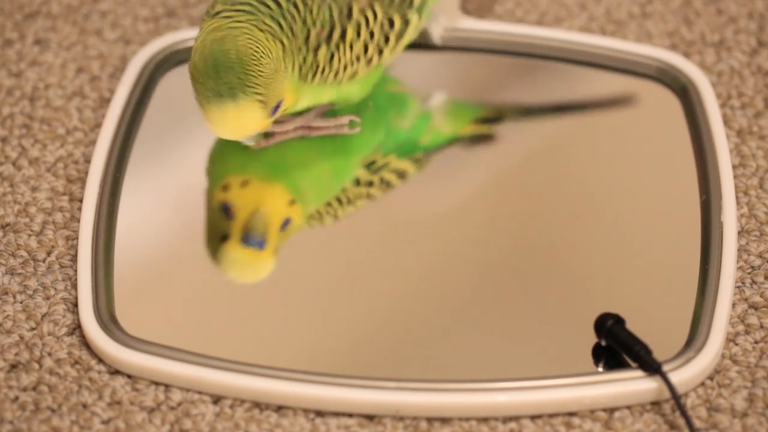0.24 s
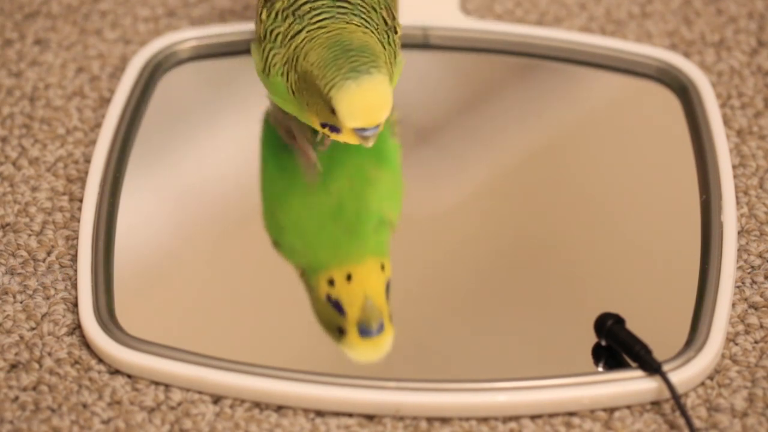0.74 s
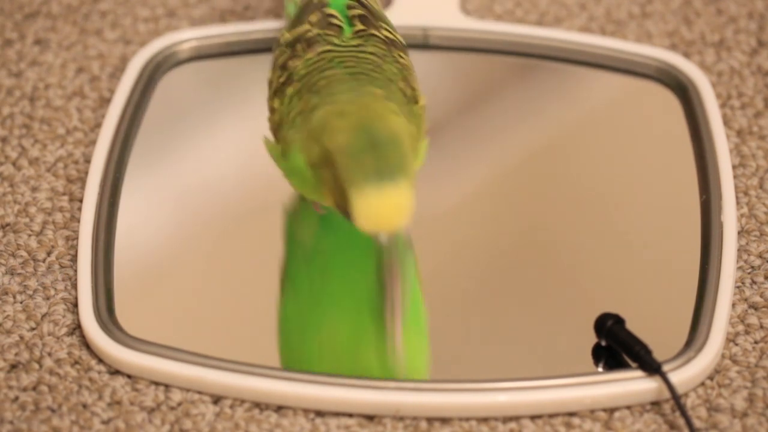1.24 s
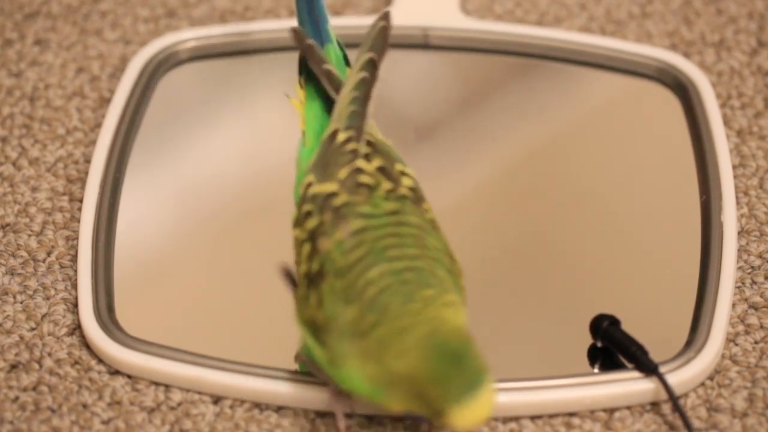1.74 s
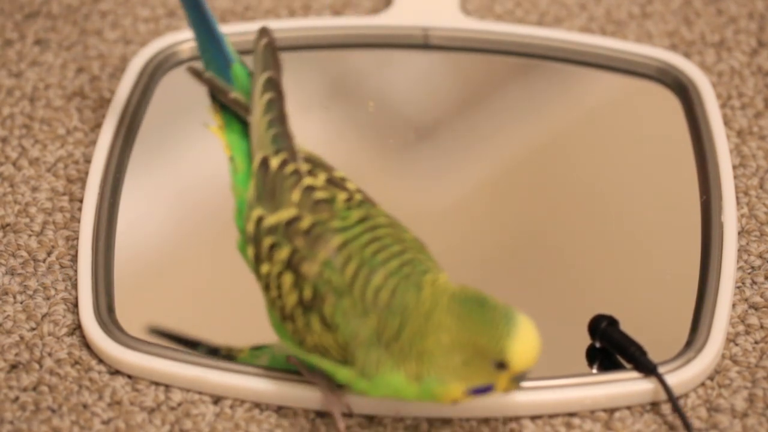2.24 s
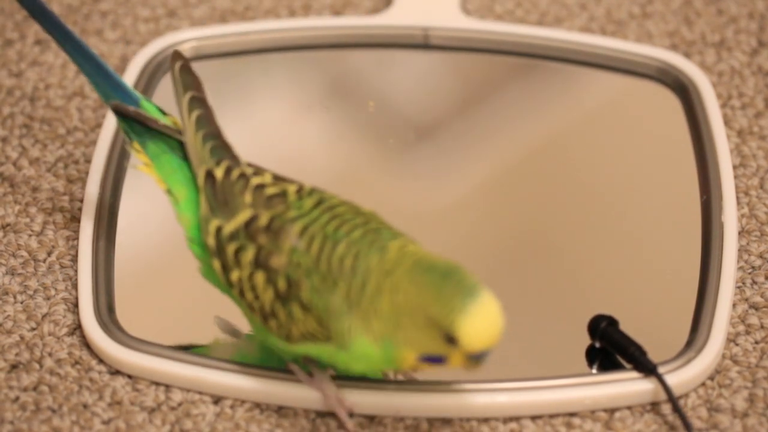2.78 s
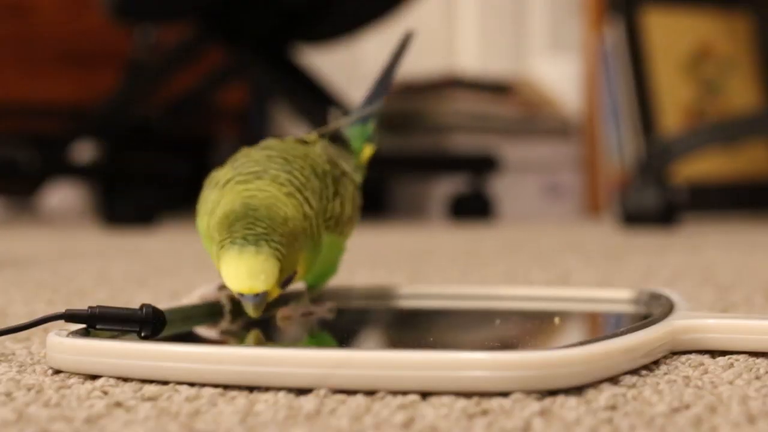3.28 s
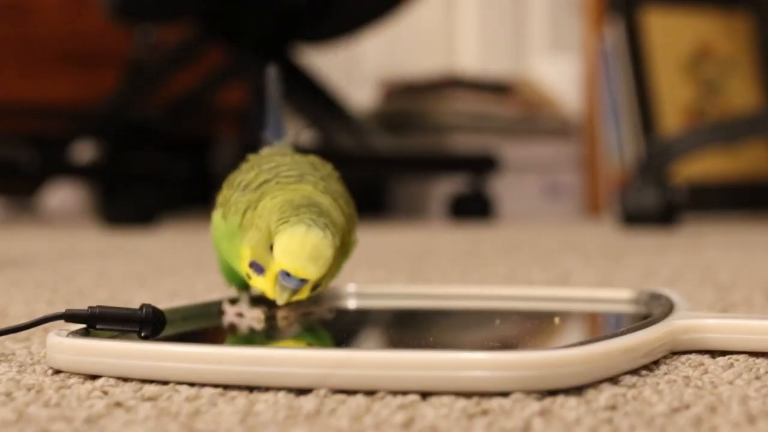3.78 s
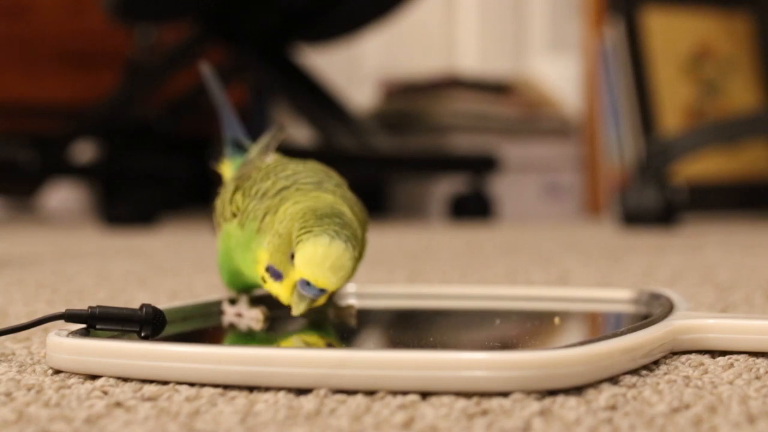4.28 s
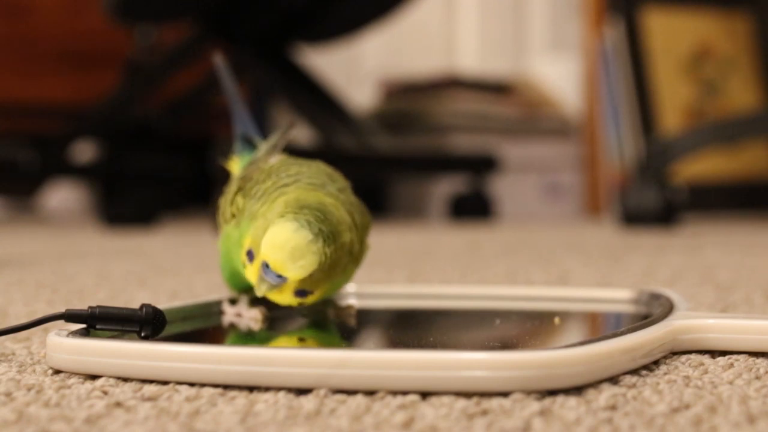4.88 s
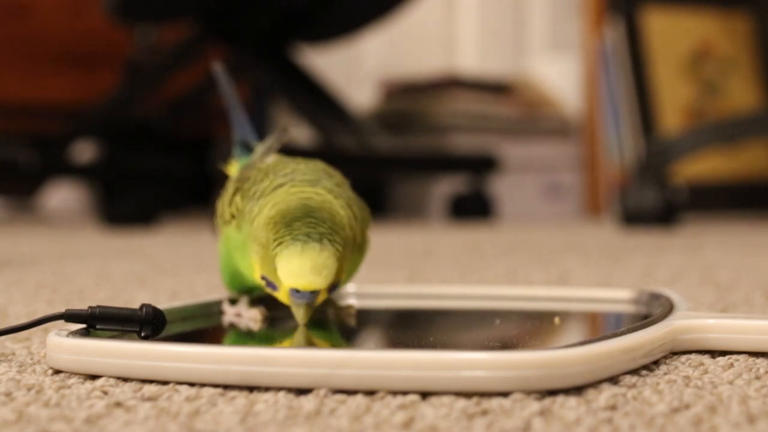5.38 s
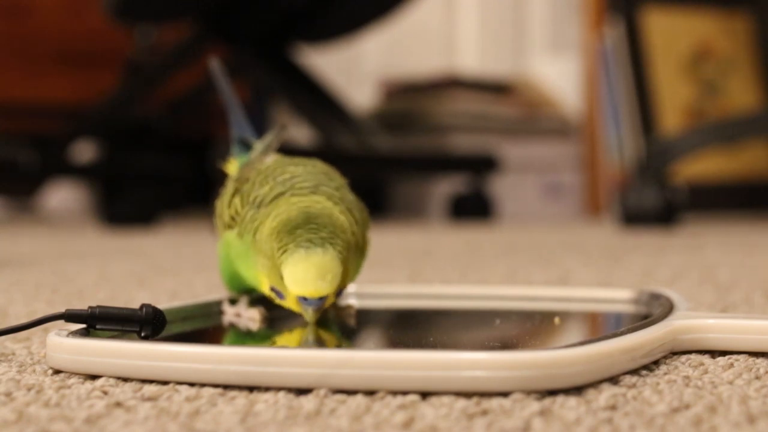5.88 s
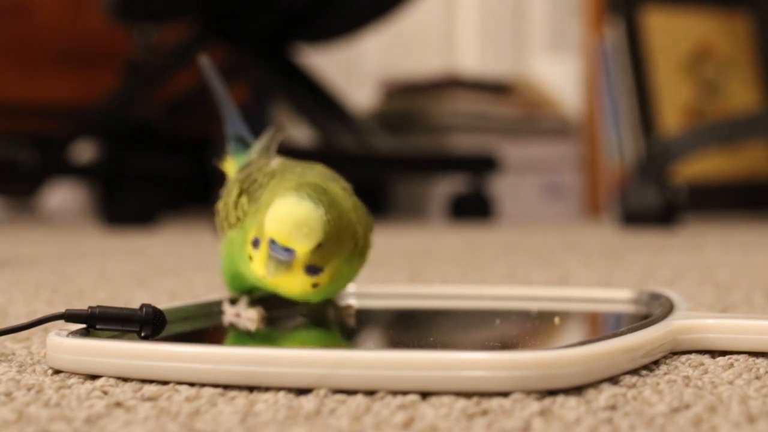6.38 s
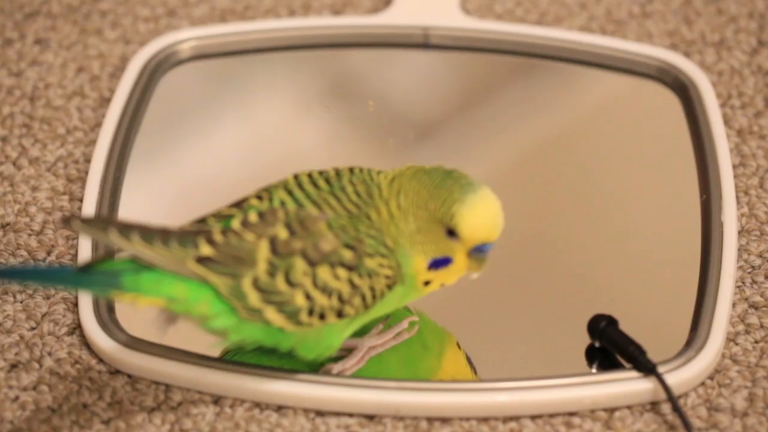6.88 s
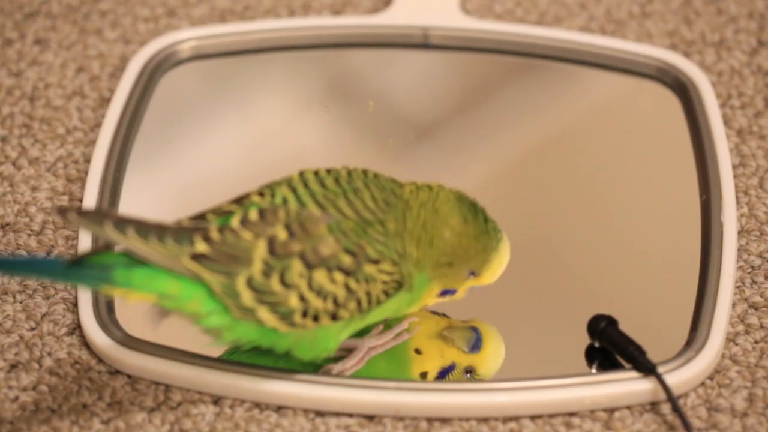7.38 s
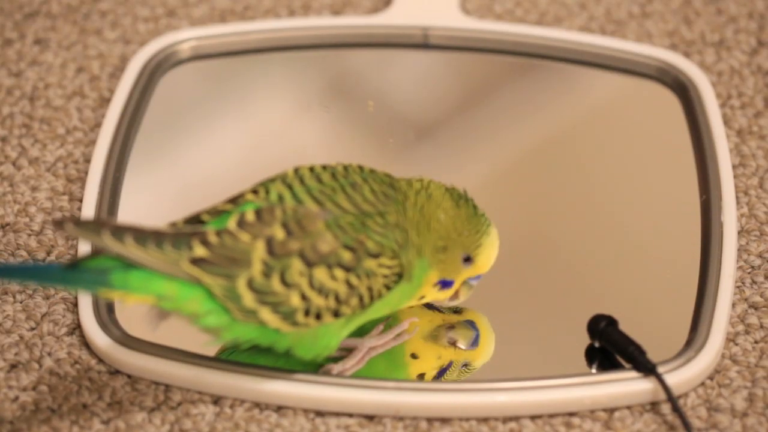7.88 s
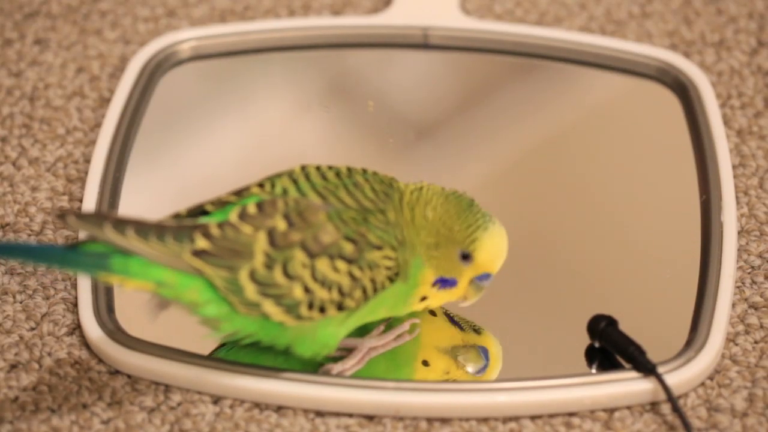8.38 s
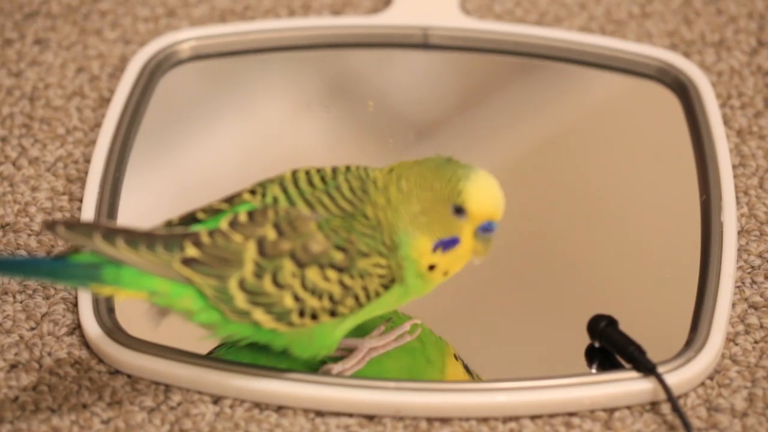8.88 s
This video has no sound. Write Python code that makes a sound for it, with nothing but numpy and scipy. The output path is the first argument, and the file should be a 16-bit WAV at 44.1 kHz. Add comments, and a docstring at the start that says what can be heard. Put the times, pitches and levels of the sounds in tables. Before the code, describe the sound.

A budgie's claws click and its beak taps sharply on a glass mirror lying on carpet, with a few raspy chirps from another budgie farther off.

```python
"""Carpeted room: a budgie walks over a hand mirror lying on the carpet, tapping and nibbling the glass up
close. Beak and claws are filtered impulses with chatter; steps and firm pecks ring the mirror's damped modes,
two landings thump. Nibbles and scrapes are grains of stick-slip noise. A second budgie farther off chirps with
fluttering harmonics and raspy noise, heard with the room's noise tail. Rumble, hum, hiss and soft rustling lie
beneath."""
import sys
import numpy as np
from scipy import signal
from scipy.fft import rfft, irfft, next_fast_len
from scipy.io import wavfile
from scipy.ndimage import map_coordinates

SR = 44100
rng = np.random.default_rng(int(sys.argv[2]) if len(sys.argv) > 2 else 0)


def wrap_up_sound(samples):
    """Save the sound to the file named by the first command line argument, as 16-bit audio."""
    columns = np.atleast_2d(samples).T
    # keep every value between -1 and 1, then stretch to whole-number steps
    tamed = np.clip(columns, -1, 1)
    steps = np.round(tamed * 32767).astype(np.int16)
    wavfile.write(sys.argv[1], SR, steps)


N = 403074

PECK_BODY_DB = -14.5  # low body against the knock, for beak contacts
LONG_CHATTER_T60_S = 0.0084  # claws and nibbles skid longer than a peck


def amp(db):
    """Decibels to gain."""
    return 10 ** (np.asarray(db) / 20)


def unit(x):
    """Scale to rms 1."""
    return x / np.sqrt(np.mean(x ** 2) + 1e-20)


def burst(x):
    """Scale to the energy of one millisecond at rms 1."""
    return x * np.sqrt(SR / 1000 / np.sum(x ** 2))


def along(points, hz):
    """Interpolate (Hz, value) points on a log frequency axis."""
    point_hz, values = np.transpose(points)
    return np.interp(np.log(hz + 1), np.log(point_hz + 1), values)


def clock(length_s):
    """Sample times over a length."""
    return np.arange(int(length_s * SR)) / SR


def curves(rows):
    """Each column interpolated per sample from the first row's time to the last's."""
    times, *columns = np.transpose(rows)
    t = times[0] + clock(times[-1] - times[0])
    return [np.interp(t, times, column) for column in columns]


def add(track, start_s, x):
    """Mix x into the track at a time."""
    part = track[max(round(start_s * SR), 0):][:len(x)]
    part += x[:len(part)]


def wobble(size, rate_hz):
    """Smooth random curve through rate_hz knots a second."""
    knots = rng.standard_normal(int(size * rate_hz / SR) + 4)
    return map_coordinates(knots, [np.arange(size) * rate_hz / SR])


def coloured(x, spectrum):
    """Shape x by (Hz, dB) points, at rms 1."""
    gain = amp(along(spectrum, np.fft.rfftfreq(len(x), 1 / SR)))
    return unit(irfft(rfft(x) * gain, len(x)))


def bandpass(x, band_hz, order=3):
    """Causal Butterworth band filter."""
    return signal.sosfilt(signal.butter(order, band_hz, "bandpass", fs=SR, output="sos"), x)


def contact(knock_db, tick_db, tip_hz, body_db, t60_s, chatter=.3, blow_t60_s=0.0041, tip_q=3.9, tip_gain=5.1):
    """Hard horn on glass: a sharp impulse and brief chatter, coloured by how the tip lands."""
    # body, knock, click and tick: (from [Hz], to [Hz])
    bands = [(280, 900), (1250, 3000), (3000, 8000), (7000, 17000)]
    # the mid click swells as the tip rings lower
    click_offset_db, click_ref_hz, click_db_per_octave = 0.5, 12000, 10.5
    t = clock(.03)
    impulse = t == 0
    grit = chatter * rng.standard_normal(len(t))
    blow = impulse + grit * amp(-60 * t / blow_t60_s)
    skid = impulse + grit * amp(-60 * t / t60_s)
    # the tip itself rings for a few cycles, high in the treble
    tip = skid + tip_gain * signal.lfilter(*signal.iirpeak(tip_hz, tip_q, fs=SR), skid)
    click_db = (knock_db + tick_db) / 2 + click_offset_db
    click_db += click_db_per_octave * np.log2(click_ref_hz / tip_hz)
    levels_db = [knock_db + body_db, knock_db, click_db, tick_db]
    parts = zip(bands, levels_db, [blow, blow, skid, tip])
    return sum(amp(db) * burst(bandpass(x, band)) for band, db, x in parts)


def ring(spot_hz, spot_db=10, spot_width=.15, scatter_db=2):
    """The mirror rings, quickly damped by the carpet; each spot drives most strongly the modes that move there."""
    # modes of the mirror in its frame: (frequency [Hz], relative level [dB], t60 [s])
    modes = [(440, -13, .03), (510, -4, .035), (735, -7, .042), (900, -3, .03), (1110, 2, .026),
             (1215, 1, .024), (1440, 0, .024), (1720, -2, .022), (1950, 0, .028)]
    t = clock(.1)
    hz, level_db, t60_s = np.transpose(modes)[:, :, None]
    drive_db = spot_db * np.exp(-(np.log(hz / spot_hz) / spot_width) ** 2)
    drive_db = drive_db + scatter_db * rng.standard_normal(hz.shape)
    polarity = rng.choice([-1, 1], hz.shape)
    ringing = amp(level_db + drive_db - 60 * t / t60_s) * np.sin(2 * np.pi * hz * t) * polarity
    return burst(ringing.sum(axis=0))


def mirror_blows():
    """Claws or a firm beak click, then the foot's weight or the blow rings the mirror and presses the carpet;
    landings on the frame thump."""
    # a foot lands or shifts, or the beak strikes firmly: (time [s], claw level [dB], weight level [dB],
    # frequency this spot rings most [Hz])
    blows = [(0.412, -23, -39.5, 735), (0.4233, -35, -52, 730), (0.4973, -32, -32, 480),
             (0.8793, -35, -37, 510), (1.1365, -30.5, -37.5, 535), (1.2174, -37, -36.5, 510),
             (1.446, -31, -30.5, 1180), (1.4591, -25, -29, 1180), (1.4682, -29, -43, 1170),
             (1.473, -23.5, -17, 1300), (1.8069, -24.5, -40, 470), (1.8113, -23.5, -41.5, 485),
             (2.146, -80, -50.5, 1430), (2.4128, -23.5, -42.5, 1300), (2.7477, -16, -37.5, 1950),
             (2.7536, -25, -40, 1400), (3.097, -24, -35.5, 1700), (3.2649, -46, -37.5, 1360),
             (3.446, -67, -40.5, 433), (3.691, -32, -56, 1200), (3.7188, -27.5, -52, 504),
             (3.7628, -33, -54, 1700), (3.7727, -26.5, -48, 1700), (3.9912, -27.5, -33.5, 880),
             (5.6155, -57, -38, 515), (5.678, -73.5, -46, 500), (5.834, -48, -28, 507),
             (5.9548, -33.5, -35, 520), (7.6288, -45.5, -39, 1340), (7.8612, -39, -31.5, 600)]
    # the bird's weight lands on the frame: (time [s], level [dB], frequency [Hz], t60 [s])
    landings = [(1.472, -34.5, 54.7, 0.39), (3.44, -32, 71.6, 0.067)]
    claw_hz = 12000
    knock_db, body_db = -7, -2  # knock against the weight; low body against the knock
    toe_lag_s, toe_db = .0042, -14.5  # a second claw touches later and more lightly
    weight_lag_s = 0.000878
    thud_hz, thud_db, thud_t60_s = 104.1, -14, 0.079  # the frame sinks into the carpet; dB against the weight
    out, t = np.zeros(N), clock(.25)
    thud = amp(thud_db - 60 * t / thud_t60_s) * np.sin(2 * np.pi * thud_hz * t)
    for s, claw_db, weight_db, spot_hz in blows:
        for lag_s, db in [(0, 0), (toe_lag_s, toe_db)]:
            click = contact(weight_db + knock_db, claw_db, claw_hz, body_db, LONG_CHATTER_T60_S)
            add(out, s + lag_s, amp(db) * click)
        add(out, s + weight_lag_s, amp(weight_db) * ring(spot_hz))
        add(out, s + weight_lag_s, amp(weight_db) * thud)
    for s, db, thump_hz, t60_s in landings:
        add(out, s, amp(db - 60 * t / t60_s) * np.sin(2 * np.pi * thump_hz * t))
    return out


def pecks():
    """The beak taps the glass: single hard contacts, each with its own tip resonance."""
    # levels as energy over 1 ms: (time [s], knock level [dB], tick level [dB], tip resonance [Hz])
    strikes = [(3.0595, -66, -44, 11500), (3.4652, -57, -51, 11500), (4.1507, -79, -34.5, 13400),
               (4.211, -53, -48, 11500), (4.2262, -38, -7, 13400), (4.2602, -50, -23, 14200),
               (4.2927, -42, -51, 13500), (4.3021, -58, -20, 15000), (4.3125, -43, -51, 10600),
               (4.6404, -33.5, -11, 9150), (4.715, -42, -24, 13100), (4.7321, -28.5, -19, 8100),
               (4.7495, -46, -31, 11700), (4.7826, -69, -42, 14100), (4.8179, -57, -38, 13600),
               (4.907, -48, -55, 11500), (5.0126, -55, -64, 11500), (5.043, -77, -36, 12500),
               (5.067, -58, -36, 11300), (5.1015, -61, -42, 12500), (5.4216, -47, -46, 11100),
               (5.4271, -40.5, -46, 13800), (5.5094, -80.5, -42.5, 13600), (5.821, -18, -14, 14100),
               (5.8622, -30.5, -30, 14100), (5.8774, -21, -18, 14100), (5.9004, -26, -20.5, 11800),
               (5.9176, -38.5, -34, 14000), (6.4313, -50, -44, 11600), (7.5343, -62, -27.5, 13200),
               (7.7245, -58, -41, 13100), (7.8615, -24.5, -9, 12430), (7.8863, -36, -12, 14100),
               (8.2892, -68, -28.5, 11400), (8.5389, -43.5, -35, 11700)]
    out = np.zeros(N)
    for s, knock_db, tick_db, tip_hz in strikes:
        add(out, s, contact(knock_db, tick_db, tip_hz, PECK_BODY_DB, t60_s=.003))
    return out


def rubbing(length_s, hz, slip_rate_hz=600, spread_db=6, rub=0.055, low_db=-14):
    """The tip rubs over the glass, sticking and slipping in tiny uneven ticks."""
    size, most = len(clock(length_s)), SR // 8
    slips = (rng.random(most) < slip_rate_hz / SR) * amp(spread_db * rng.standard_normal(most))
    friction = (slips + rub * rng.standard_normal(most))[:size]
    grains = coloured(friction, [(hz / 10, low_db), (hz / 2, -6), (hz, 0), (hz * 4, -9)])
    return grains * signal.windows.tukey(len(grains), .3)


def nibbles(jitter_s=0.0025, scatter_db=0.5, knock_db=-6, count=2):
    """The beak works about ten times a second; each stroke rubs and catches a few times."""
    # bouts: (start [s], end [s], starting level [dB], fade [dB/s])
    bouts = [(4.29, 5.33, -51.5, 3.5), (5.893, 6.15, -55, 7.5), (7.926, 8.3, -50.5, 4.5)]
    period_s, stroke_s = .1012, .026
    bright_hz, tick_db = 12500, 6.5  # brightest part of a stroke; its ticks against the rubbing
    out = np.zeros(N)
    for start, end, bout_db, fade in bouts:
        for beat in np.arange(start, end, period_s):
            s = beat + jitter_s * rng.standard_normal()
            db = bout_db - fade * (beat - start) + scatter_db * rng.standard_normal()
            add(out, s, amp(db) * rubbing(stroke_s, bright_hz))
            for lag_s in stroke_s * rng.random(count):
                catch = contact(db + knock_db, db + tick_db, bright_hz, PECK_BODY_DB, LONG_CHATTER_T60_S)
                add(out, s + lag_s, catch)
    return out


def scrapes():
    """Single drags of claw or beak, as stick-slip rubbing."""
    # (time [s], length [s], level [dB], brightest frequency [Hz])
    drags = [(1.444, 0.031, -48, 3000), (1.477, 0.039, -53, 1560), (2.676, 0.069, -56, 9000),
             (2.996, 0.062, -53.5, 3800), (3.7, .08, -63, 12000), (5.825, 0.014, -42.5, 3000),
             (5.826, 0.067, -52, 13000), (7.869, 0.017, -51, 9000)]
    out = np.zeros(N)
    for s, length_s, db, hz in drags:
        add(out, s, amp(db) * rubbing(length_s, hz))
    return out


def syrinx(pitch_hz, overtones_db, rough, flutter_rate_hz):
    """A whistle with overtones whose pitch flutters quickly."""
    fluttering_hz = pitch_hz * (1 + rough * wobble(len(pitch_hz), flutter_rate_hz))
    phase = 2 * np.pi * np.cumsum(fluttering_hz) / SR
    return unit(sum(amp(db) * np.sin((k + 1) * phase) for k, db in enumerate(overtones_db)))


def call(shape, overtones_db, rasp_spectrum, rough):
    """A fluttering whistle and the rasp, as noise, of the same membranes beating irregularly."""
    pitch_hz, whistle_db, rasp_db = curves(shape)
    whistle = syrinx(pitch_hz, overtones_db, rough, flutter_rate_hz=790)
    rasp = coloured(rng.standard_normal(len(pitch_hz)), rasp_spectrum)
    return amp(whistle_db) * whistle + amp(rasp_db) * rasp


def note(length_s, hz, overtone_db=-28, hoarse_db=-14):
    """A soft warbled note: fluttering whistle with a little hoarse noise around its pitch."""
    swell = signal.windows.tukey(len(clock(length_s)), .8)
    whistle = syrinx(np.full(len(swell), hz), [0, overtone_db], rough=.028, flutter_rate_hz=500)
    hoarse_spectrum = [(hz / 2, -45), (hz, 0), (hz * 2, -35), (hz * 4, -60)]
    hoarse = coloured(rng.standard_normal(len(swell)), hoarse_spectrum)
    return swell * (whistle + amp(hoarse_db) * hoarse)


def chirps():
    """Two soft notes lead each tchip, which opens raspy and clears to a whistle; warbles and one hoarse chirp."""
    # levels here are ahead of the room mix
    # short "tchip": (time after its start [s], pitch [Hz], whistle level [dB], rasp level [dB])
    tchip = [(.004, 3600, -66, -56), (.019, 3780, -33, -38), (.028, 3800, -33, -42), (.034, 3840, -41, -48),
             (.041, 3920, -26, -47), (.05, 3965, -21, -46), (.062, 3950, -28, -54), (.072, 3935, -38, -62),
             (.085, 3920, -70, -80)]
    # tchips: (time [s], gain [dB])
    tchip_times = [(2.343, -0.5), (4.532, -1), (8.327, -1)]
    # rising notes before a tchip: (lead [s], length [s], pitch [Hz], level against the tchip's gain [dB])
    lead_in = [(.047, .033, 1620, -60), (.019, .03, 2090, -53)]
    # hoarse chirp climbing unevenly: (time [s], pitch [Hz], whistle level [dB], rasp level [dB])
    squawk = [(6.105, 1950, -68, -76), (6.127, 2800, -50, -54), (6.141, 2530, -42, -48),
              (6.149, 3300, -36, -35), (6.165, 2900, -38, -37), (6.179, 3070, -25, -36),
              (6.189, 3550, -22, -34), (6.2, 3760, -26, -44), (6.222, 3680, -56, -68)]
    # quiet warbled notes: (time [s], length [s], pitch [Hz], level [dB])
    warbles = [(2.466, 0.03, 1420, -59), (2.553, 0.032, 1563, -53), (2.679, 0.054, 2636, -59.5),
               (4.782, 0.043, 1710, -66), (4.818, .035, 2077, -47.5), (8.454, .035, 1410, -60),
               (8.541, 0.041, 1616, -58.5), (8.659, 0.06, 2617, -59)]
    # whistle harmonics 1 to 4: relative level [dB]
    tchip_overtones_db = [2, -15.5, -18, -21.5]
    # whistle harmonics 1 to 4: relative level [dB]
    squawk_overtones_db = [0.5, -25, -32, -22.5]
    # rasp colour: (frequency [Hz], relative level [dB])
    tchip_rasp = [(1000, -40), (1400, -13), (1800, -1), (2600, 1), (3300, 0), (4300, -3), (4900, -22),
                  (9000, -22), (14000, -18), (17000, -30)]
    # rasp colour: (frequency [Hz], relative level [dB])
    squawk_rasp = [(1500, -38.5), (2000, -13), (2500, 5.5), (3000, 3.5), (3700, -7), (4200, -21),
                   (5500, -21.5), (7000, -19), (10500, -34.5), (14000, -18.5), (17000, -23.5)]
    out = np.zeros(N)
    for s, db in tchip_times:
        add(out, s + tchip[0][0], amp(db) * call(tchip, tchip_overtones_db, tchip_rasp, rough=.016))
        for lead_s, length_s, hz, note_db in lead_in:
            add(out, s - lead_s, amp(db + note_db) * note(length_s, hz))
    add(out, squawk[0][0], call(squawk, squawk_overtones_db, squawk_rasp, rough=.028))
    for s, length_s, hz, db in warbles:
        add(out, s, amp(db) * note(length_s, hz))
    return out


def room(x, early_db, early_t60_s):
    """Dense early reflections and a tail in which each frequency dies at its own speed."""
    # reverberation: (frequency [Hz], t60 [s])
    reverberation = [(200, 0.36), (1500, 0.34), (4000, 0.31), (8000, 0.27), (15000, .22)]
    hz, t, z = signal.stft(rng.standard_normal(SR // 2), SR, nperseg=256)
    late = amp(-60 * t / along(reverberation, hz)[:, None])
    early = amp(early_db - 60 * t / early_t60_s)
    tail = signal.istft(z * (late + early), SR, nperseg=256)[1]
    tail = np.pad(tail, (SR // 300, 0))  # reflections start 1/300 s late
    return signal.fftconvolve(x, tail / np.linalg.norm(tail))[:N]


def rustle(swells, floor_db, spectrum, flicker_db):
    """Soft brushing noise with a quick flicker, swelling and fading over a steady floor."""
    t = np.arange(N) / SR
    level = amp(floor_db) + sum(amp(db) * np.exp(-((t - s) / half_s) ** 2) for s, half_s, db in swells)
    noise = coloured(rng.standard_normal(N), spectrum)
    return level * unit(amp(flicker_db * wobble(N, 110)) * noise)


def background(hum_hz=123.7, hum_db=-55.5, air_db=-49):
    """Room rumble and hiss as shaped noise, a wavering appliance hum, brushing feathers and soft rustling."""
    # rumble and hiss: (frequency [Hz], relative level [dB])
    air_colour = [(15, 2.5), (28, 4.5), (50, -2.5), (80, -5.5), (125, -4), (165, -11), (250, -14),
                  (400, -22), (1000, -29), (2000, -33), (4000, -40), (9000, -42), (15500, -42)]
    # feathers brush as the bird moves: (middle [s], half length [s], level [dB])
    feather_swells = [(.7, 0.5, -75), (1.46, 0.12, -59), (1.78, 0.024, -56.5), (3.4, 0.31, -69),
                      (4.9, 0.74, -73.5), (6.39, .09, -65), (7.85, 0.62, -71)]
    # feathers: (frequency [Hz], relative level [dB])
    feather_colour = [(500, -13.5), (2000, -4), (6000, -6.5), (12000, 1.5), (16000, -7)]
    # soft rustling over a steady murmur of air: (middle [s], half length [s], level [dB])
    rustle_swells = [(.12, 0.31, -69.5), (6.98, 0.055, -60)]
    # rustling: (frequency [Hz], relative level [dB])
    rustle_colour = [(150, -24), (400, -0.5), (1500, -4), (3500, -10), (8000, -24), (16000, -19.5)]
    t = np.arange(N) / SR
    air = amp(air_db) * coloured(rng.standard_normal(N), air_colour)
    hum_level = amp(hum_db + 2.8 * wobble(N, 5))
    hum = hum_level * np.sin(2 * np.pi * hum_hz * t + 1.1 * wobble(N, 12))
    feathers = rustle(feather_swells, -88.5, feather_colour, flicker_db=4.5)
    rustling = rustle(rustle_swells, -76, rustle_colour, flicker_db=2)
    return air + hum + feathers + rustling


def scene():
    """The mirror is close and nearly dry; the calling bird is mixed equally direct and through the room."""
    floor = background()
    near = pecks() + mirror_blows() + scrapes() + nibbles()
    near = near + amp(-24.5) * room(near, early_db=1.5, early_t60_s=0.162)
    far = chirps()
    far = amp(-0.5) * far + amp(-0.5) * room(far, early_db=5.5, early_t60_s=0.076)
    return (near + far + floor)[None]


def record(dry):
    """The recorder rounds off the very sharpest peaks and cuts steeply above its band limit."""
    top_hz, ceiling = 16150, .85
    rounded = dry / (1 + np.abs(dry / ceiling) ** 6) ** (1 / 6)
    size = next_fast_len(N + SR // 2)
    low_pass = 1 / (1 + (np.fft.rfftfreq(size, 1 / SR) / top_hz) ** 120)
    return irfft(rfft(rounded, size) * low_pass, size)[..., :N]


dry = scene()
out = record(dry)
wrap_up_sound(out)
```